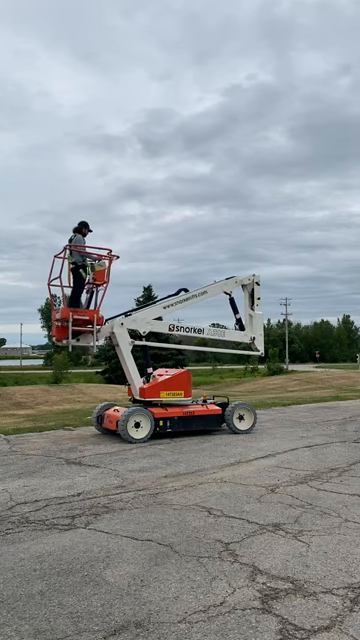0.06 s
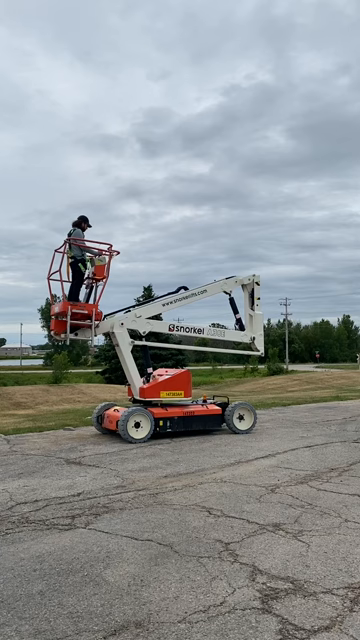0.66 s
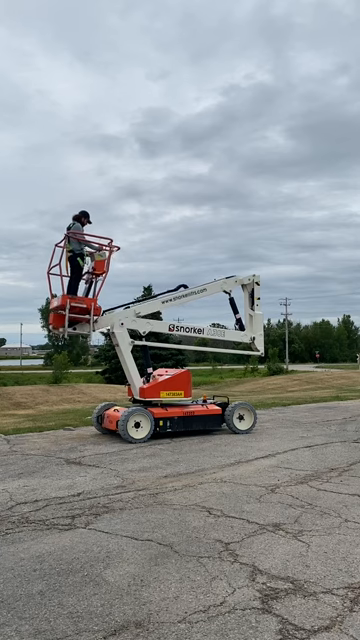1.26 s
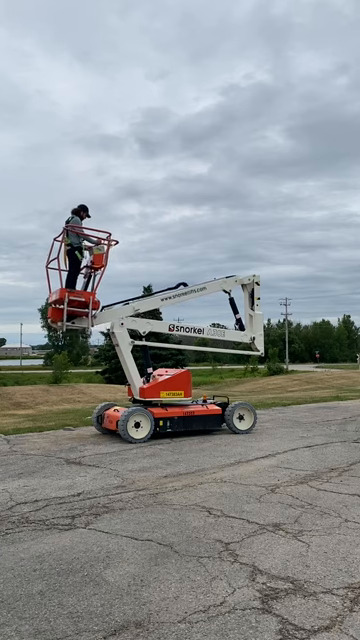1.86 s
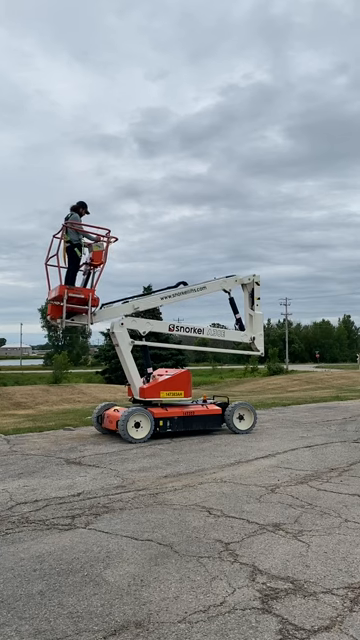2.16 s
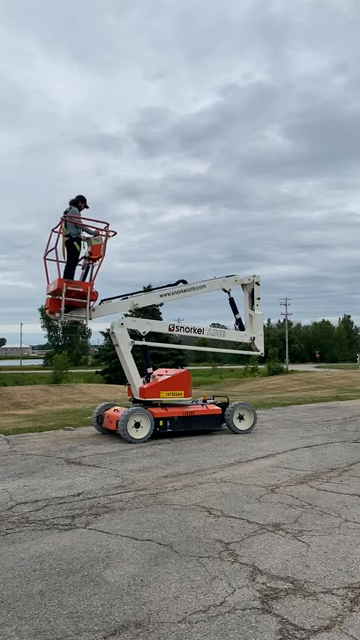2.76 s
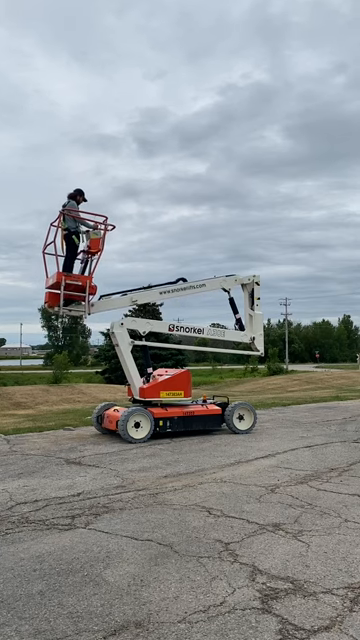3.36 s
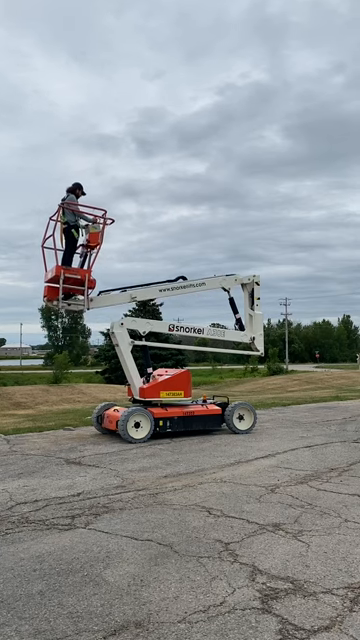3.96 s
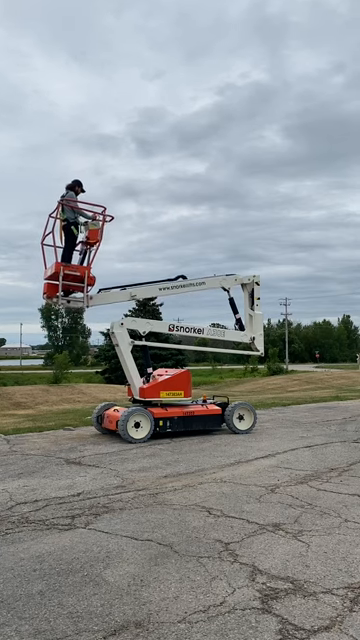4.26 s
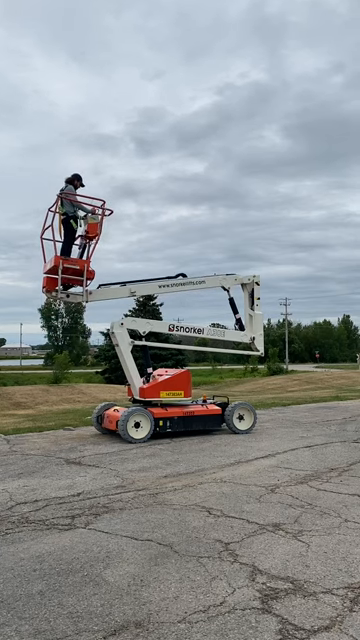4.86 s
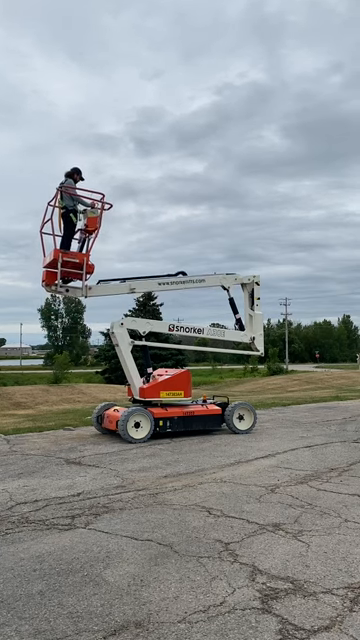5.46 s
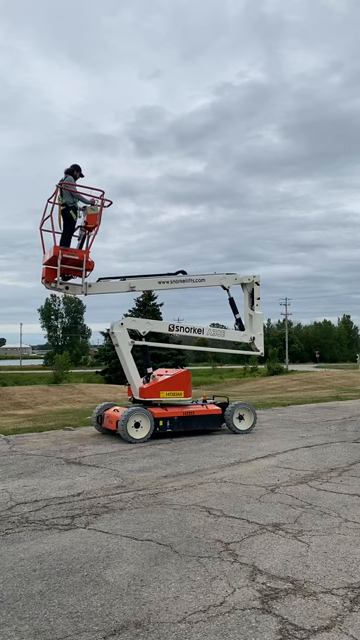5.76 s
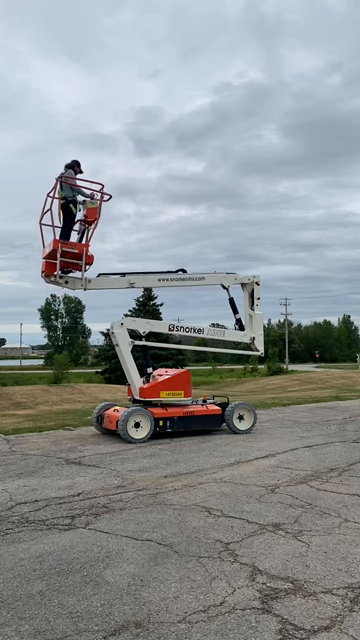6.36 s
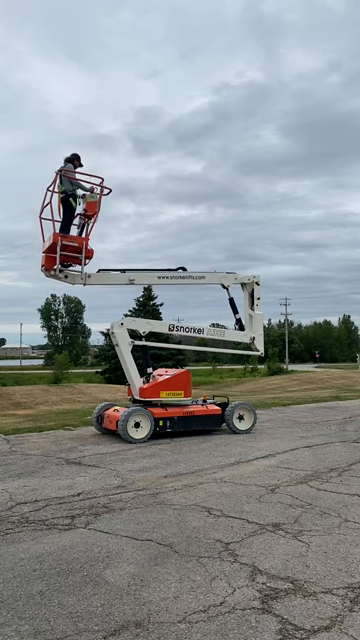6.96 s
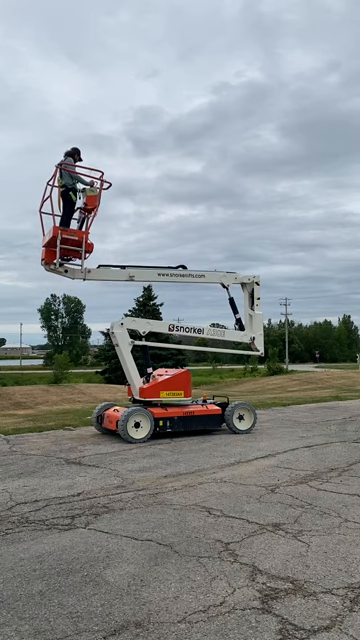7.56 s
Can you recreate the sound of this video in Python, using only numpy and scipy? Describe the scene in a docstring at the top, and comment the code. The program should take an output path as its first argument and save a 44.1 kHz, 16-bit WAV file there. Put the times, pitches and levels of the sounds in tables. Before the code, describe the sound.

An electric boom lift's pump hums and whines steadily outdoors, with a few early metal clacks, distant birds and a low rumble.

```python
"""On an open paved yard, some metres away, an electric boom lift raises its basket.
Its pump hums and whines at multiples of the shaft speed, over a faint buzz and a hiss of oil and air.
Metal knocks three times in the boom and sets the steel ringing, and a thin squeal comes and goes.
Far birds sing and trill, and two level whistles sound, perhaps from the hydraulics.
Under it all lies a low outdoor rumble with a hum and a few soft bumps."""
import sys
import numpy as np
from scipy import signal
from scipy.fft import rfft, irfft, next_fast_len
from scipy.io import wavfile

SR = 44100
rng = np.random.default_rng(int(sys.argv[2]) if len(sys.argv) > 2 else 0)


def materialize(psi):
    """Save the field psi as 16-bit PCM at rate SR to the path in sys.argv[1].

    A 1-D psi becomes a single channel; in a 2-D psi each row is a channel.
    """
    bounded = np.clip(np.atleast_2d(psi).T, -1, 1)
    quanta = np.round(bounded * 32767).astype(np.int16)
    wavfile.write(sys.argv[1], SR, quanta)


N = 336262
TIME = np.arange(N) / SR
FFT_SIZE = next_fast_len(N + SR // 4)
BIN_HZ = np.maximum(np.arange(FFT_SIZE // 2 + 1) * SR / FFT_SIZE, 1)   # the frequencies a filter acts on
CUTOFF_HZ = 15750

# Levels in the tables are relative: the functions add their own gain.
# The pump shaft surges at the first clacks, dips at the last, then sags under load: time_s, speed_rpm
SHAFT_SPEED = [(0.0, 1895), (0.27, 1881), (0.42, 1884), (0.55, 1880.5), (0.75, 1887.6), (0.95, 1892.5),
               (1.1, 1884), (1.35, 1879), (1.5, 1871.5), (1.75, 1876.5), (2.3, 1877), (3.0, 1875.4),
               (4.5, 1874), (7.62, 1872.7)]
# Tones of the pump and motor: cycles_per_turn, level_db
PUMP_TONES = [(9, -60), (12, -50.2), (13, -52.5), (19, -67), (22, -71), (24, -73), (41, -78), (48, -79),
              (49, -71.5), (60, -84), (72, -74.5), (75, -81), (84, -78), (96, -78), (103, -85), (122, -85),
              (141, -87), (144, -86), (148, -80), (149, -77.5), (150, -81.5), (154, -87), (156, -85),
              (157, -86), (163, -84), (168, -82), (174, -84.5), (195, -84), (199, -86), (206, -87),
              (207, -88), (246, -87), (264, -89), (276, -88), (288, -88), (312, -86), (324, -84),
              (336, -84), (348, -88)]
# How loud the high whine is: time_s, level_db
WHINE_LEVEL = [(0.0, 2), (1.5, 1.5), (1.9, 0.5), (3.3, 0.5), (5.0, 1.5), (7.62, 2.5)]
# One tone of the whine sinks after the clacks and slowly returns: time_s, level_db
FADING_TONE_LEVEL = [(0.0, -2), (0.9, 0), (1.55, -3), (1.75, -6), (2.35, -3), (2.8, -5), (6.0, -0.5),
                     (7.62, -0.5)]
# Hiss of oil, motor brushes and open air, from low to high: frequency_hz, level_db
HISS_COLOUR = [(500, -79), (800, -82), (1250, -85.5), (1750, -93), (2050, -93), (2400, -91.5),
               (3200, -93.5), (3900, -97), (4450, -100), (5300, -97.5), (5900, -102), (7200, -107),
               (10500, -107), (13800, -113), (15000, -117)]
# How loud the hiss is: time_s, level_db
HISS_LEVEL = [(0.0, -55.5), (1.55, -52.5), (2.95, -54), (6.15, -53.5), (7.62, -53)]
# Clacks in the boom; the second is a softer rebound: start_s, level_db, treble_edge_hz
CLACKS = [(0.78, -27.5, 13000), (0.868, -32.5, 7500), (1.367, -30.5, 15000)]
# Notes the steel rings with, and their time to fade by 60 dB: pitch_hz, level_db, ring_s
STEEL_NOTES = [(1060, -3, .1), (1545, -4, .11), (1652, -2, .12), (1783, -3, .11), (1850, -1, .11),
               (4128, -1, .06), (4398, 0, .09), (4543, 0, .07), (5044, 3, .11), (5630, 1, .06),
               (5905, 3, .07), (6250, 3, .06), (6922, 4, .05), (7428, 7, .045), (8144, 0, .04),
               (8898, 2, .05)]
# The crash of many high steel notes packed close together: frequency_hz, level_db
CRASH_COLOUR = [(600, -5), (1600, 5), (2600, 1.5), (4000, 4), (5300, 6), (6200, -1), (7300, -23), (8800, 1),
                (10000, -5.5), (11800, -0.5), (13000, -11), (16000, -8)]
# Spurts of the thin squeal: start_s, length_s, level_db
SQUEAL_SPURTS = [(1.45, 0.48, -67), (2.3, 0.21, -62.5), (3.02, .16, -66), (3.21, .21, -59.5),
                 (3.83, 0.23, -63.5), (4.0, 0.35, -67), (4.54, .4, -63.5), (4.87, .24, -66.5),
                 (6.3, 0.26, -65), (7.2, 0.33, -66)]
# Gliding bird whistles, then two level whistles near 3.8 kHz, perhaps from the hydraulics:
# start_s, length_s, start_hz, middle_hz, end_hz, level_db
WHISTLES = [(1.898, 0.027, 4120, 3500, 2900, -62), (2.35, 0.068, 4020, 3730, 3205, -66),
            (2.697, .04, 4120, 4130, 3950, -60), (2.726, .028, 4050, 3550, 2950, -57.5),
            (3.005, .05, 2850, 3080, 2850, -63), (3.096, .025, 5200, 4600, 4100, -64),
            (3.172, .058, 3900, 4450, 5520, -59), (3.29, .162, 6200, 4350, 3300, -56.5),
            (3.962, 0.15, 3890, 3800, 3815, -54.5), (4.249, 0.27, 3790, 3773, 3780, -68)]
# A bird's long trill swells twice and trails off: time_s, level_db
TRILL_LEVEL = [(5.65, -75), (5.95, -57), (6.25, -50.5), (6.48, -55), (6.65, -50), (6.84, -58), (7.0, -62),
               (7.25, -56), (7.62, -59)]
# The outdoor rumble, from low to high: frequency_hz, level_db
RUMBLE_COLOUR = [(20, -84), (32, -83), (45, -57), (57, -57), (80, -57), (110, -60), (145, -63.5),
                 (180, -66), (245, -69.5), (340, -71.5), (400, -74.5), (460, -76)]
# Hollow drones within the rumble: pitch_hz, width_hz, boost_db
DRONES = [(59.4, 12, 2), (100, 18, -1), (226, 5.5, -1), (240.4, 12.8, 4.5), (283.5, 3.8, 1), (479, 31, 4.5)]
# Slow swell of the deep rumble: time_s, level_db
RUMBLE_SWELL = [(0.0, -3), (1.7, -3.5), (2.25, -5.5), (2.9, -0.5), (4.2, -1.5), (4.7, -4.5), (5.3, -4),
                (6.2, -1.5), (7.62, -4)]
# Soft low bumps: middle_s, level_db, pitch_hz
BUMPS = [(2.951, -29.5, 108), (3.339, -23.5, 58.5), (3.495, -27, 66), (4.14, -34, 59.4), (4.261, -27, 74.6),
         (5.02, -30.5, 60), (6.417, -27.5, 61)]
# How alike the left and right sides sound: frequency_hz, likeness (0 to 1)
STEREO_LIKENESS = [(50, .9), (90, .85), (140, .86), (260, .95), (380, .94), (520, .64), (800, .6),
                   (1700, .62), (2500, .58), (3500, .62), (5000, .36), (6200, .7), (7300, .95), (9000, .85),
                   (15000, .8)]
# How far the left side's wave runs ahead of the right: frequency_hz, lead_radians
LEFT_LEAD = [(100, 0), (1000, -.25), (1900, 0), (2600, 1.7), (3900, 1.0), (4800, .3), (5400, .5),
             (6100, 1.6), (7300, 3.1), (8700, 4.7), (10500, 6.3), (13500, 9.4), (15500, 12.3)]
# The left side's level minus the right side's: frequency_hz, balance_db
LEFT_BALANCE = [(80, -0.5), (250, -0.5), (550, -3), (2300, -2.5), (3300, -0.5), (16000, -0.5)]


def pump_tones(rpm, turns, hum_db=-1.85, surge_db_per_rpm=0.0758, hum_waver=0.097, whine_waver=0.24):
    """The turning shaft makes a low hum, louder as it speeds up, and a high whine that wavers more."""
    group_size, fading_multiple = 24, 49
    steps_s = np.arange(0, TIME[-1] + 1, .1)
    # Tones in one group waver together, so close ones beat evenly once a turn.
    wobbles = rng.standard_normal((group_size, 2, len(steps_s)))
    hum_level = hum_db + surge_db_per_rpm * (rpm - np.median(rpm))
    whine_level = over_time(WHINE_LEVEL)
    tones = np.zeros(N)
    for multiple, db in PUMP_TONES:
        whine_share = np.interp(multiple, [13, 70], [0, 1])
        waver = hum_waver + whine_share * (whine_waver - hum_waver)
        swing, slip = (np.interp(TIME, steps_s, row) for row in waver * wobbles[multiple // group_size])
        fade_db = over_time(FADING_TONE_LEVEL) if multiple == fading_multiple else 0
        gain = from_db(db + fade_db + hum_level + whine_share * (whine_level - hum_level))
        phase = 2 * np.pi * multiple * turns + slip + 0.34 * rng.standard_normal()
        tones += gain * (1 + swing) * np.sin(phase)
    return np.sqrt(2) * tones


def hiss(turns, level_db=-1.56, purr_depth=0.056, low_edge_hz=480, treble_hz=2500, segments=6):
    """Oil, brushes and air hiss. Six unequal segments each rasp once a turn, so the treble purrs."""
    segment = (turns * segments).astype(int) % segments
    rasp = unit_level(rng.standard_normal(segments))[segment] + np.cos(2 * np.pi * segments * turns)
    colour = from_db(over_frequency(HISS_COLOUR)) / np.sqrt(1 + (low_edge_hz / BIN_HZ) ** 8)
    noise = stereo_noise(colour)
    treble = filtered(noise, 1 / (1 + (treble_hz / BIN_HZ) ** 4))
    purr = purr_depth * (rasp - rasp.mean()) * treble
    level = over_time(HISS_LEVEL)
    return from_db(level_db + 0.55 * (level - np.median(level))) * (noise + purr)


def gear_buzz(turns, level_db=-13, treble_db=4, treble_hz=5000, low_edge_hz=600, points=2048):
    """The same small bumps pass on every turn, making many faint tones, clearest in the treble."""
    one_turn = irfft(np.exp(2j * np.pi * rng.random((2, points // 4))), points)
    buzz = np.array([np.interp(turns % 1 * points, np.arange(points), side) for side in one_turn])
    boost_db = treble_db / (1 + (treble_hz / BIN_HZ) ** 2)
    colour = from_db(over_frequency(HISS_COLOUR) + level_db + boost_db)
    colour /= 1 + (low_edge_hz / BIN_HZ) ** 2
    return spread_stereo(unit_level(buzz), np.sqrt(CUTOFF_HZ) * colour)


def boom_clacks(ring_db=-18, crash_db=-8.5, rise_s=0.0046, contact_s=0.013, tick_s=0.0022):
    """Metal hits metal: a sharp tick, a crash, ringing steel and a weak echo from the yard."""
    chatter, crash = np.zeros((2, N)), np.zeros((2, N))
    age = TIME[:SR // 2]
    onset = 1 - np.exp(-(age / rise_s) ** 2)
    yard_echo = from_db(-18) * die_away(age, fade_s=0.67)
    crash_shape = onset * (die_away(age, fade_s=0.095) + yard_echo)
    tick = np.exp(-age / tick_s)
    for start_s, db, treble_edge_hz in CLACKS:
        softness = signal.butter(2, treble_edge_hz, fs=SR)
        grit = from_db(db) * signal.lfilter(*softness, rng.standard_normal((2, 2, len(age))))
        span = slice(int(start_s * SR), int(start_s * SR) + len(age))
        chatter[:, span] += grit[0] * onset * np.exp(-age / contact_s) / np.sqrt(contact_s * SR / 2)
        crash[:, span] += grit[1] * (crash_shape + tick)
    steel = sum(from_db(db) * steel_ring(chatter, hz, ring_s) for hz, db, ring_s in STEEL_NOTES)
    colour = from_db(over_frequency(CRASH_COLOUR)) / (1 + (500 / BIN_HZ) ** 2)
    return spread_stereo(steel, from_db(ring_db)) + spread_stereo(crash, from_db(crash_db) * colour)


def steel_ring(force, pitch_hz, ring_s):
    """Each push on the steel starts a pure note that dies away."""
    decay, angle = die_away(1 / SR, ring_s), 2 * np.pi * pitch_hz / SR
    return signal.lfilter([0, np.sin(angle)], [1, -2 * decay * np.cos(angle), decay ** 2], force + 1e-18)


def squeal(level_db=1.5, pitch_hz=2789, wander_hz=7, flutter=0.38, ramp_s=0.09, idle_db=-74):
    """A thin whistle, unrelated to the shaft speed, stays faint and flares up in spurts."""
    spurts = np.zeros(N)
    for start_s, length_s, db in SQUEAL_SPURTS:
        inside_s = np.minimum(TIME - start_s, start_s + length_s - TIME)
        spurts += from_db(db) * np.clip(inside_s / ramp_s, 0, 1)
    level = np.maximum(spurts, from_db(idle_db)) * (1 + flutter * drift(rate_hz=40))
    cycles = np.cumsum(pitch_hz + wander_hz * drift(rate_hz=40)) / SR
    return np.sqrt(2) * from_db(level_db) * level * np.sin(2 * np.pi * cycles)


def whistles(level_db=-2, pan_db=5, flutter=0.18, echo_db=-12, echo_s=0.07):
    """Gliding bird notes and two level whistles come from the left, unsteady and smeared by trees."""
    notes = np.zeros(N)
    for start_s, length_s, start_hz, middle_hz, end_hz, db in twitter_notes() + list(WHISTLES):
        progress = np.linspace(0, 1, int(length_s * SR))
        glide = np.polyfit([0, .5, 1], [start_hz, middle_hz, end_hz], 2)
        cycles = np.cumsum(np.polyval(glide, progress)) / SR
        start = int(start_s * SR)
        notes[start:start + len(cycles)] += from_db(db) * arch(progress) * np.sin(2 * np.pi * cycles)
    notes *= 1 + flutter * drift(rate_hz=60)
    echo_shape = np.exp(-TIME[:SR // 2] / echo_s) / np.sqrt(echo_s * SR / 2)
    scatter = rng.standard_normal((2, SR // 2)) * echo_shape
    echo = signal.fftconvolve(notes[None], scatter, axes=1)[:, :N]
    direct = left_first(notes, lag_s=0.00003) * from_db([[pan_db], [-pan_db]])
    return from_db(level_db) * (direct + from_db(echo_db) * echo)


def twitter_notes(start_s=1.023, period_s=0.0645, chip_s=0.016, turn_s=0.02, level_db=-59):
    """Four quick bird chirps, listed like WHISTLES: each dives, breaks off and climbs back."""
    low_hz, turn_hz, high_hz = 3550, 3950, 5400
    notes = []
    for chirp in range(4):
        at_s = start_s + period_s * chirp
        dive = (at_s, chip_s, high_hz, (high_hz + low_hz) / 2, low_hz, level_db)
        climb = (at_s + turn_s, chip_s * 0.92, turn_hz, (high_hz + turn_hz) / 2, high_hz, level_db)
        notes += [dive, climb]
    return notes


def trilling_bird(level_db=-3, start_s=5.661, period_s=0.03597, low_hz=4300, high_hz=6400):
    """A second bird, off to one side, repeats one quick upward chip that thins out as it climbs."""
    progress = np.minimum((TIME - start_s) / period_s % 1 / 0.54, 1)   # a chip fills 54% of a period
    cycles = np.cumsum(low_hz + (high_hz - low_hz) * progress) / SR
    chips = arch(progress ** 0.68) ** 3   # each is loudest early on
    level = (TIME > start_s) * from_db(level_db + over_time(TRILL_LEVEL))
    return left_first(level * chips * np.sin(2 * np.pi * cycles), lag_s=0.00008)


def low_bumps(width_s=0.014):
    """Each bump is a few soft cycles of very low sound."""
    bumps = np.zeros(N)
    for middle_s, db, pitch_hz in BUMPS:
        swell = from_db(db) * np.exp(-((TIME - middle_s) / width_s) ** 2)
        bumps += swell * np.cos(2 * np.pi * (pitch_hz * (TIME - middle_s) + rng.random()))
    return bumps


def far_hum(pitch_hz=147, level_db=-50, waver=0.17):
    """A low tone hangs in the rumble and slowly grows louder and softer."""
    level = from_db(level_db) * (1 + waver * drift(rate_hz=1))
    return np.sqrt(2) * level * np.sin(2 * np.pi * pitch_hz * TIME + drift(rate_hz=0.77))


def outdoor_rumble(deep_db=1.1, body_db=-0.23, waver_db=0.7, low_hz=20, split_hz=170, high_hz=480):
    """Low noise with a few drones: the deep part swells and sinks, the part above it is steady."""
    drones_db = sum(db / (1 + (2 * (BIN_HZ - hz) / width_hz) ** 2) for hz, width_hz, db in DRONES)
    colour = from_db(over_frequency(RUMBLE_COLOUR) + drones_db)
    colour /= np.sqrt((1 + (BIN_HZ / high_hz) ** 8) * (1 + (low_hz / BIN_HZ) ** 4))
    deep_share = 1 / (1 + (BIN_HZ / split_hz) ** 4)
    swell = from_db(deep_db + over_time(RUMBLE_SWELL) + waver_db * drift(rate_hz=6))
    deep = swell * stereo_noise(colour * np.sqrt(deep_share))
    body = from_db(body_db) * stereo_noise(colour * np.sqrt(1 - deep_share))
    return deep + body


def stereo_noise(colour):
    """Left and right noise; colour sets its strength at each frequency."""
    return spread_stereo(rng.standard_normal((2, FFT_SIZE)), colour * np.sqrt(SR / 2))


def spread_stereo(pair, gain):
    """Filter two unrelated sounds and mix them so that left and right are partly alike."""
    alike = np.clip(over_frequency(STEREO_LIKENESS), 0, .99)
    middle, side = rfft(pair, FFT_SIZE)
    mixed = np.sqrt(1 + alike) * middle + np.sqrt(1 - alike) * side * [[1], [-1]]
    return irfft(mixed * gain / np.sqrt(2), FFT_SIZE)[:, :N]


def left_first(sound, lag_s):
    """A sound from the left reaches the right side a moment later."""
    return filtered(sound, np.exp(1j * np.pi * BIN_HZ * lag_s * np.array([[1], [-1]])))


def filtered(sound, response):
    """Change the strength and timing of each frequency in a sound."""
    return irfft(rfft(sound, FFT_SIZE) * response, FFT_SIZE)[..., :N]


def drift(rate_hz, step_s=0.002):
    """A smooth random wobble of size about 1; a higher rate makes it quicker."""
    memory = np.exp(-2 * np.pi * rate_hz * step_s)
    steps_s = np.arange(-1, TIME[-1] + 1, step_s)
    wobble = signal.lfilter([1], [1, -2 * memory, memory ** 2], rng.standard_normal(len(steps_s)))
    return unit_level(np.interp(TIME, steps_s, wobble))


def die_away(age_s, fade_s):
    """A gain that falls by 60 dB every fade_s seconds."""
    return from_db(-60 * age_s / fade_s)


def arch(progress):
    """Rise from silence and fall back as progress goes from 0 to 1."""
    return np.sin(np.pi * np.clip(progress, 0, 1))


def over_time(table):
    """Join a table's points into a value for every sample."""
    return np.interp(TIME, *np.transpose(table))


def over_frequency(table):
    """Join a table's points into a value for every frequency, with octaves evenly spaced."""
    hz, value = np.transpose(table)
    return np.interp(np.log(BIN_HZ), np.log(hz), value)


def unit_level(sound):
    """Scale a sound so that its average strength (rms) is 1."""
    return sound / np.sqrt(np.mean(sound ** 2) + 1e-20)


def from_db(db):
    """Turn decibels into a number to multiply by."""
    return 10 ** (np.asarray(db) / 20)


def scene():
    """The shaft drives the tones, the buzz and the purr of the hiss; the rest sounds on its own."""
    rpm = over_time(SHAFT_SPEED)
    turns = np.cumsum(rpm / 60) / SR
    lift = pump_tones(rpm, turns) + hiss(turns) + gear_buzz(turns) + squeal() + boom_clacks()
    return lift + outdoor_rumble() + far_hum() + low_bumps() + whistles() + trilling_bird()


def record(dry):
    """Each side of the microphone has its own level and timing, and the highest treble is cut."""
    left = from_db(over_frequency(LEFT_BALANCE) / 2) * np.exp(.5j * over_frequency(LEFT_LEAD))
    stereo = filtered(dry, np.array([left, 1 / left]))
    treble_cut = signal.ellip(10, .1, 80, CUTOFF_HZ, fs=SR, output="sos")
    return signal.sosfilt(treble_cut, stereo)


dry = scene()
out = record(dry)
materialize(out)
```